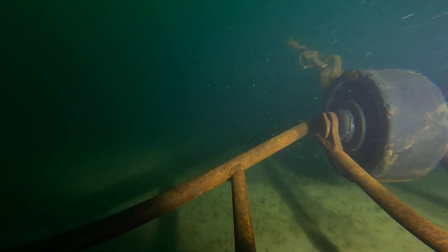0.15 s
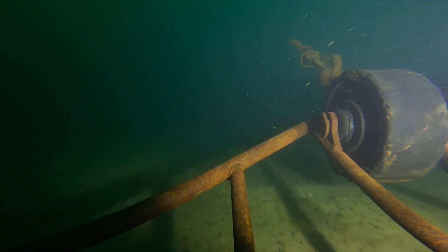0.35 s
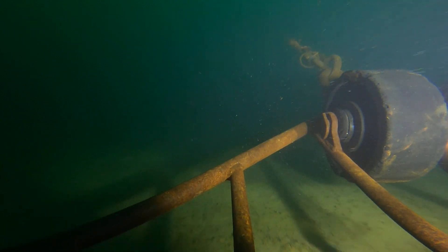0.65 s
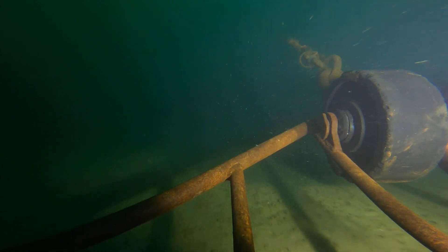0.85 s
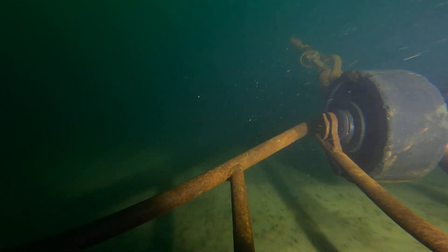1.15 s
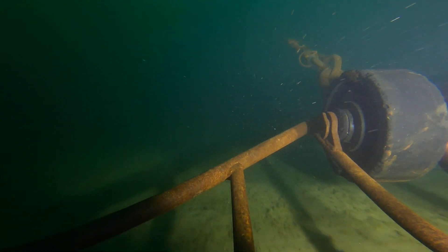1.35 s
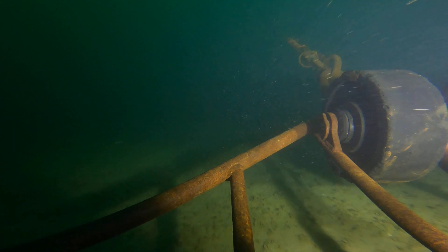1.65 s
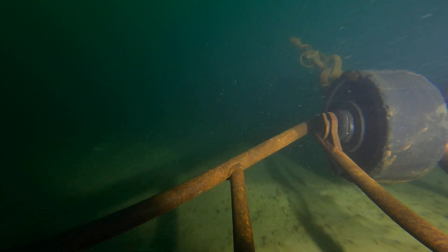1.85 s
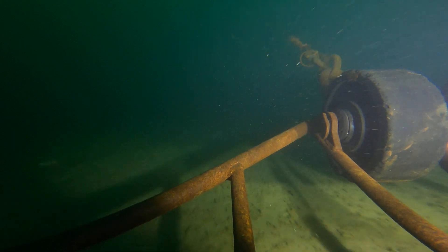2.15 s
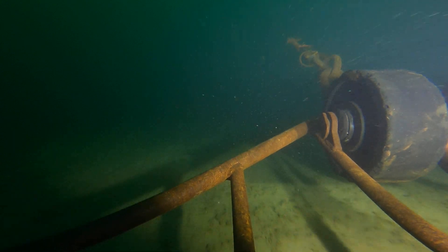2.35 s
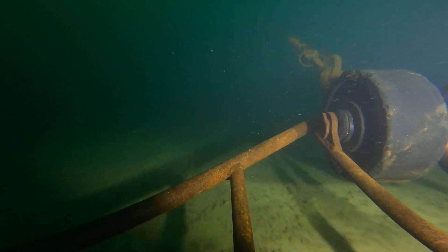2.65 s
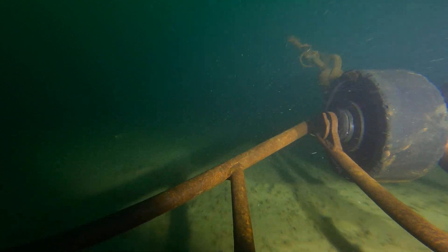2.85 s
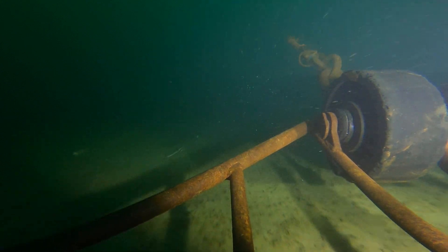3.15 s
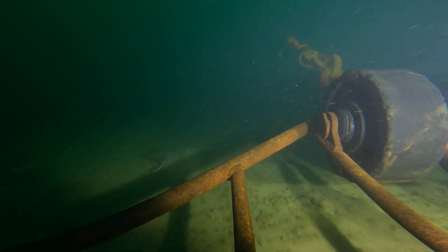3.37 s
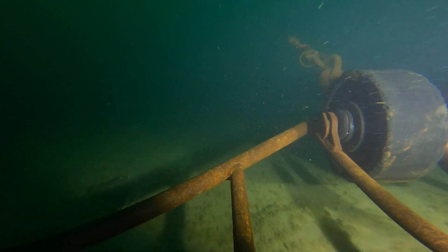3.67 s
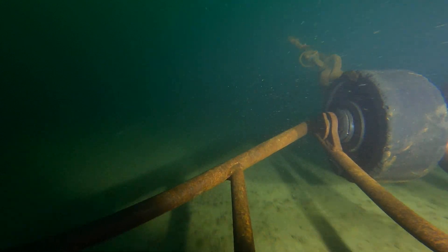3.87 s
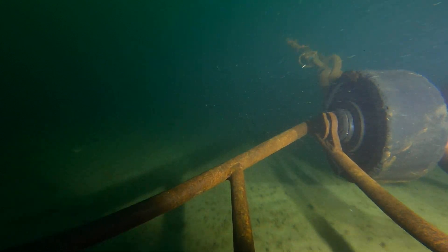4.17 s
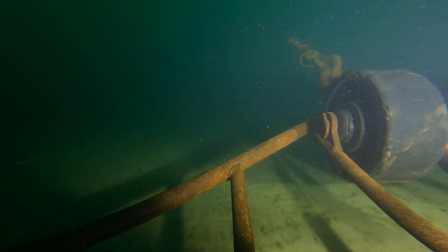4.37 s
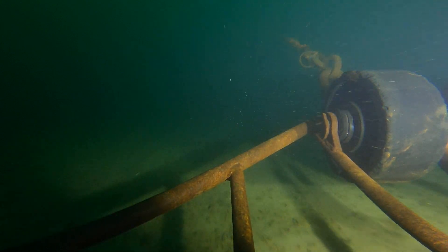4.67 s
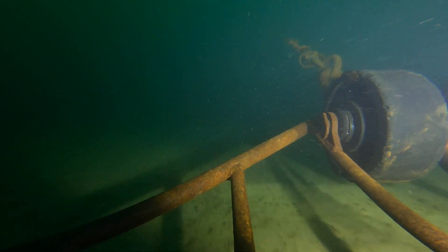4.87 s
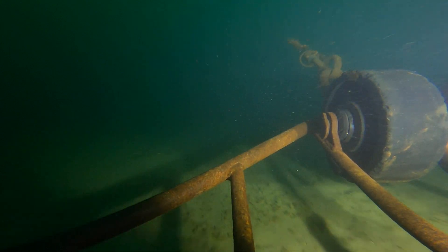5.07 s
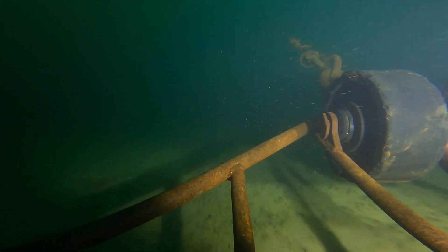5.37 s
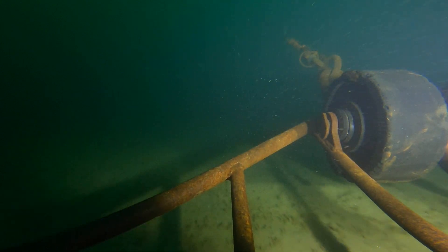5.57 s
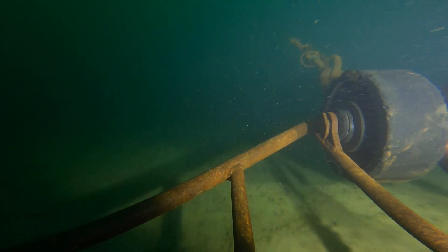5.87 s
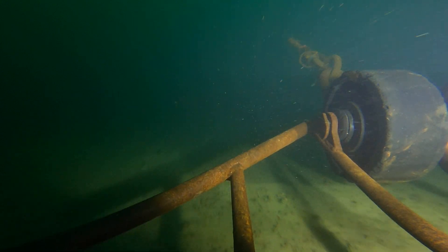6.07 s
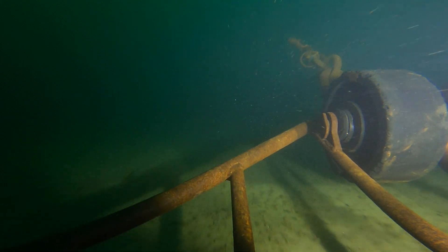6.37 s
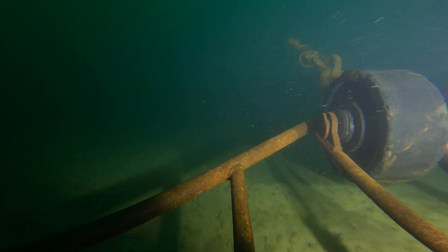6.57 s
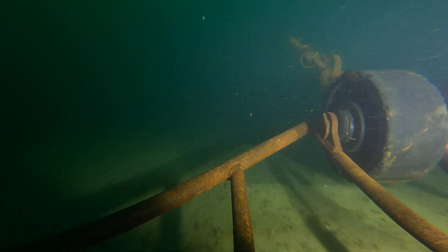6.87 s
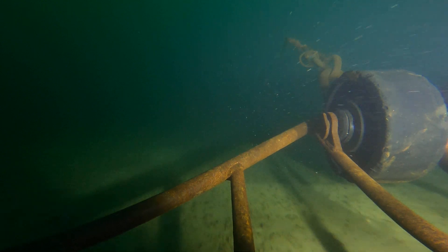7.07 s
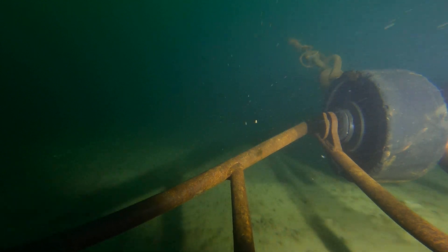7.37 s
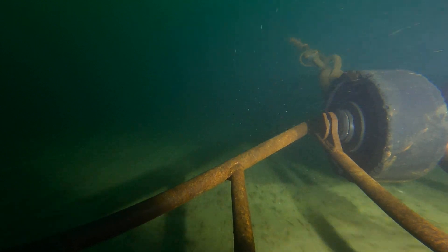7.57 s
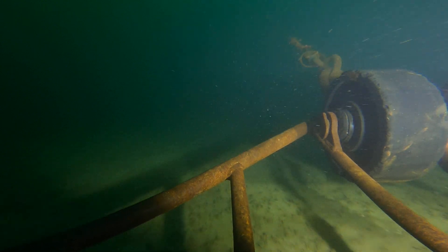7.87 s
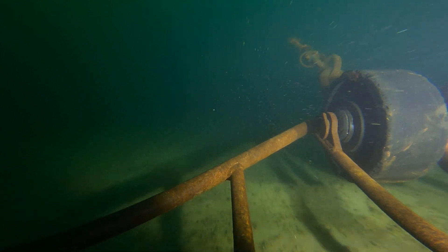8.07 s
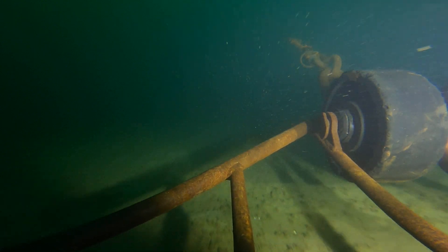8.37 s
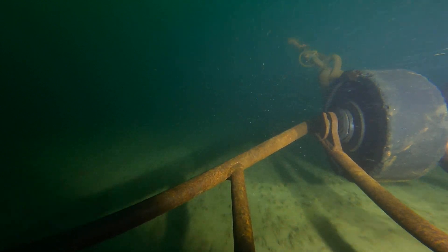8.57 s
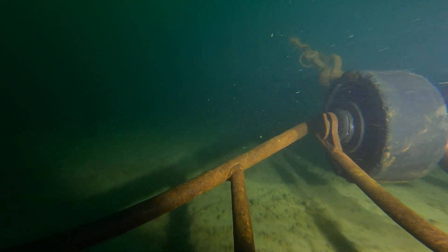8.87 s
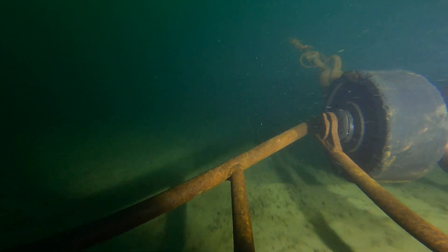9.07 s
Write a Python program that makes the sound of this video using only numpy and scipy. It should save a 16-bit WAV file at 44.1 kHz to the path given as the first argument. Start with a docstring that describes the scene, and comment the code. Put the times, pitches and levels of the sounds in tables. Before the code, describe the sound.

Underwater, a steel dredge grinds across sandy gravel: a low wavering hum under constant gritty scraping, dull stone knocks and bright shell clinks.

```python
"""Dredge on a sandy seabed

A steel dredge is towed over sand, heard under water from a housing fixed to its frame.
The taut tow line strums as a wandering low sine, over a wash of filtered noise.
Gravel grinds as dense random grains; stones knock and shells clink as noise bursts through frame modes.
Sand crackles in short swells; now and then the frame thuds, grit ticks and a bubble rings."""
import sys
import numpy as np
from scipy import signal
from scipy.fft import rfft, irfft, next_fast_len
from scipy.io import wavfile
from scipy.ndimage import uniform_filter1d

SR = 44100
rng = np.random.default_rng(int(sys.argv[2]) if len(sys.argv) > 2 else 0)


def int16_out(signal):
    """Quantize to a 16-bit WAV file."""
    q = np.round(np.clip(np.atleast_2d(signal).T, -1, 1) * 32767)
    wavfile.write(sys.argv[1], SR, q.astype(np.int16))


N = 407043
SIZE = next_fast_len(N + SR // 2)  # transform length, with room for tails
HZ = np.maximum(np.arange(SIZE // 2 + 1) * SR / SIZE, 1)
TIME = np.arange(N) / SR


def from_db(db):
    """Decibels to gain."""
    return 10 ** (np.asarray(db) / 20)


def rms_one(x):
    """Scale to unit power."""
    return x / np.sqrt(np.mean(np.abs(x) ** 2) + 1e-20)


def over_hz(points):
    """Draw a curve of (f/Hz, value) over every frequency, straight in log frequency."""
    hz, value = np.transpose(points)
    return np.interp(np.log(HZ), np.log(hz), value)


def in_time(curve):
    """Draw a curve of (t/s, value) at every sample."""
    return np.interp(TIME, *np.transpose(curve))


def filtered(x, response):
    """Apply a frequency response."""
    return irfft(rfft(x, SIZE) * response, SIZE)[..., :N]


def noise(response):
    """Noise of unit power with the given response."""
    white = rng.standard_normal(SIZE)
    return rms_one(irfft(rfft(white) * response, SIZE)[:N])


def drift(rate_hz):
    """Slow random wander with spread 1."""
    return noise(1 / (1 + (HZ / rate_hz) ** 2))


def swells(rows):
    """Smooth bumps of height 1 from rows of (t/s, half length/s)."""
    bumps_at = (np.exp(-(((TIME - s) / half_s) ** 2).clip(0, 30)) for s, half_s in rows)
    return sum(bumps_at).clip(0, 1)


def tone(pitch_hz):
    """A sine of unit power that follows a pitch."""
    return np.sqrt(2) * np.sin(2 * np.pi * np.cumsum(pitch_hz) / SR)


def resonance(hz, width_hz):
    """Response of one mode, 1 on top."""
    return 1 / (1 + 1j * (HZ ** 2 - hz ** 2) / (HZ * width_hz))


def causal(spectrum):
    """Minimum-phase response of a spectrum: nothing sounds before its cause."""
    cepstrum = irfft(np.log(from_db(over_hz(spectrum))), SIZE)
    return np.exp(rfft(2 * cepstrum[:SIZE // 2], SIZE))


def grains(per_s, spread_db):
    """Random tiny impacts of uneven size, each reaching the two microphones a little differently."""
    sizes = from_db(spread_db * np.minimum(rng.exponential(1, N), 4)) * rng.choice([-1, 1], N)
    hits = rng.random(N) < per_s / SR
    return rms_one(sizes * hits * (1 + 0.31 * rng.standard_normal((2, N))))


def add(track, s, sound):
    """Mix a short sound in at a time."""
    start = max(round(s * SR), 0)
    track[:, start:start + sound.shape[-1]] += sound[..., :N - start]


def crunch(rise_s, t60, apart=0.27):
    """Force of one blow: a burst of micro-contacts that dies away, of unit energy."""
    t = TIME[:SR // 6]
    white = rng.standard_normal((3, len(t)))
    shape = (1 - np.exp(-t / rise_s)) * from_db(-60 * t / t60)
    burst = (white[0] + apart * white[1:]) * shape  # shared part plus a part of each side's own
    return rms_one(burst) / np.sqrt(len(t))


def blow(rise_s=0.0012, contact_s=0.012, tail_db=-4.0, tail_t60=0.23):
    """Force of a stone: a short crushing contact, then a weaker shudder; unit energy."""
    t = TIME[:SR // 6]
    white = rng.standard_normal((3, len(t)))
    crush = np.exp(-(t / contact_s) ** 4)
    shudder = from_db(tail_db - 60 * t / tail_t60)
    shape = (1 - np.exp(-t / rise_s)) * (crush + shudder)
    return rms_one((white[0] + 0.24 * white[1:]) * shape) / np.sqrt(len(t))


def ping(hz, t60):
    """One mode ringing out: a decaying sine with a soft 1 ms onset."""
    t = TIME[:SR // 8]
    return from_db(-60 * t / t60) * (1 - np.exp(-t / .001)) * np.sin(2 * np.pi * hz * t)


def pitched(contact, hz, sharpness):
    """The part of a contact that a pebble of this pitch favours, at an even strength."""
    own = rms_one(signal.lfilter(*signal.iirpeak(hz, sharpness, fs=SR), contact))
    return own * np.sqrt(np.pi * hz / sharpness / SR / contact.shape[1])


# ringing modes of the steel frame: (f/Hz, width/Hz, lift/dB)
FRAME_MODES = [(529.5, 57, 13.5), (771, 89, 7.5), (932, 91, 6.5), (1221.8, 31, 11.5), (1557, 310, 6),
               (2060, 48, 9.5), (2538, 53, 12), (2705, 101, 13), (3036, 88, 11), (3660, 82, 8.5),
               (4100, 46, 8.5), (4720, 660, 7), (6480, 110, 12), (7325, 210, 9), (7720, 190, 14),
               (8800, 410, 7), (10070, 400, 7.5)]


def frame_response(contact):
    """How the modes of the frame answer one kind of contact, at unit power."""
    response = causal(contact)
    for hz, width_hz, lift_db in FRAME_MODES:
        response = response * (1 + (from_db(lift_db) - 1) * resonance(hz, width_hz))
    return rms_one(response)


def frame(force, contact):
    """A lasting force rings the modes of the frame; power is kept."""
    return filtered(force, frame_response(contact))


def ringing(contact):
    """The frame's ring after a single tap."""
    return irfft(frame_response(contact), SIZE)[None, :SR // 8]


def struck(force, ring):
    """One blow heard through the frame, of unit energy."""
    sound = signal.fftconvolve(force, ring, axes=1)
    return rms_one(sound) / np.sqrt(sound.shape[1])


# how hard the runners bite; only its swing about the mean counts: (t/s, level/dB)
DRAG_CURVE = [(0.0, -29.5), (1.8, -31.5), (2.35, -29), (4.1, -31.5), (4.6, -25.5), (4.96, -31), (5.4, -27),
              (7.8, -30.5), (9.2, -28)]


def drag():
    """How much harder than usual the runners bite at each moment, in dB."""
    level_db = in_time(DRAG_CURVE)
    return level_db - level_db.mean()


# small bubble pinching off: (t/s, f/Hz, level/dB)
BUBBLE_PINGS = [(6.113, 2730, -24)]


def bubbles(t60=0.15):
    """A bubble rings for a moment at its own pitch."""
    out = np.zeros((2, N))
    for s, hz, db in BUBBLE_PINGS:
        add(out, s, from_db(db) * ping(hz, t60))
    return out


# the frame dropping on to the bed: (t/s, relative level/dB)
FRAME_DROPS = [(0.543, -39.5), (0.955, -41.5), (3.325, -35.5), (8.911, -41)]


def bumps(t60=0.24, gain_db=42.5):
    """The heavy frame lands with a muffled thud: a crunch through a broad low resonance."""
    force = np.zeros((2, N))
    for s, db in FRAME_DROPS:
        add(force, s, from_db(db + gain_db) * crunch(0.0088, t60))
    return filtered(force, rms_one(resonance(350, 780) ** 4))


# grit giving way under a runner: (t/s)
GRIT_SNAPS = [2.006, 3.115, 3.453, 4.723, 5.555, 6.814, 7.033, 8.504, 8.565, 8.641, 9.112]


def snaps(snap_db=-9.5, snap_hz=3200, sharpness=5, own_ring=1.3, t60=0.045):
    """A grain of grit gives way with a light, dry tick."""
    out, ring = np.zeros((2, N)), ringing(SHELL_COLOUR)
    for s in GRIT_SNAPS:
        force = crunch(.0005, t60)
        own = own_ring * pitched(force, snap_hz, sharpness)
        add(out, s, from_db(snap_db) * struck(force + own, ring))
    return out


# crests of sand sweeping over the steel: (t/s, relative level/dB)
SAND_SWEEPS = [(0.258, -37), (0.336, -39), (1.829, -39), (1.92, -38), (2.123, -27), (3.419, -30),
               (4.712, -35), (5.17, -30.5), (5.435, -26), (6.069, -29), (6.415, -30), (6.629, -30.5),
               (8.998, -28.5), (9.13, -32)]
# colour of sand on steel: (f/Hz, relative level/dB per Hz)
SAND_COLOUR = [(600, -8), (1500, 15), (3300, 1.5), (5500, 2), (7500, -11.5), (10000, -21.5), (11000, -29.5),
               (15000, -54)]
SWEEP_RISE_S, SWEEP_FALL_S = 0.031, 0.008  # every sweep swells and lets go alike


def sand(drag_db, trickle_db=-45.5, follows=0.49):
    """Fine grains crackle on the steel, swell up and let go quickly."""
    waver_db = 2.8 * drift(11)
    level = from_db(trickle_db + follows * drag_db + waver_db)
    for s, db in SAND_SWEEPS:
        rising = ((s - TIME) / SWEEP_RISE_S).clip(0) ** 2
        falling = (TIME - s) / SWEEP_FALL_S
        level = level + from_db(db) * np.exp(-np.maximum(rising, falling).clip(0, 20))
    crackle = grains(per_s=3500, spread_db=3.8)
    return frame(level * crackle, SAND_COLOUR)


# loudest shells and pebbles on bare steel: (t/s, relative level/dB, crack against clink level/dB)
SHELL_CLINKS = [(0.0803, -30, -14), (0.1017, -39, -0.5), (0.586, -31, -15), (0.909, -29, -13),
                (1.171, -38.5, -16), (1.477, -32.5, -15.5), (2.2795, -30, -13.5), (2.2946, -24, -29),
                (2.4406, -33, -11), (2.734, -25, -13.5), (2.8415, -26.5, -22), (3.325, -39.5, -13.5),
                (3.5051, -30.5, -16.5), (4.248, -30, -40.5), (4.62, -25, -16.5), (4.817, -32.5, -12),
                (5.1832, -29, -9.5), (5.3409, -27.5, -31.5), (5.38, -32.5, -17.5), (5.4266, -26, -4),
                (5.858, -26.5, -18), (6.003, -25, -2), (6.133, -24.5, -32.5), (6.155, -28, -22),
                (6.9458, -33, -10), (7.4052, -27.5, -36), (7.4795, -34.5, -8), (7.5434, -34, -15),
                (7.6675, -31.5, -19), (7.8513, -35, -12), (8.141, -32, -32.5), (8.4286, -23.5, -30),
                (8.716, -27.5, -16.5), (8.9547, -26, -7.5), (9.019, -21, -29.5)]
# modes in which the tube sings: (f/Hz, strength)
TUBE_MODES = [(2820, .4), (3577, .3), (4143, .6), (4705, 1)]
# colour of a shell on steel: (f/Hz, relative level/dB per Hz)
SHELL_COLOUR = [(400, -12), (1300, 6), (2200, 9.5), (3300, 0.5), (4700, 0), (6000, -5.5), (12000, -71)]
# colour of a sharp crack: (f/Hz, relative level/dB per Hz)
CRACK_COLOUR = [(2000, 3.5), (5700, 2), (7500, -8.5), (9000, -21.5), (13000, -26), (16000, -42)]


def shells(tap=0.93, chatter_t60=0.033, crack_t60=0.022, own_ring=0.47,
           ticks_db=-54.0, clink_db=25.0, crack_gain_db=31, sing_db=5.0):
    """Hard contacts: a sharp tap and brief chatter at the pebble's own pitch, fainter ticks between."""
    ticks = signal.fftconvolve(grains(per_s=12, spread_db=2.5), crunch(.0008, .024), axes=1)[:, :N]
    clinks = from_db(ticks_db) * frame(ticks, SHELL_COLOUR)
    cracks = np.zeros((2, N))
    shell_ring, crack_ring = ringing(SHELL_COLOUR), ringing(CRACK_COLOUR)
    for s, db, crack_db in SHELL_CLINKS:
        rattle = crunch(0.00031, chatter_t60)
        rattle = rattle + own_ring * pitched(rattle, rng.uniform(2900, 6200), 5.0)
        rattle[:, 0] += tap / 2
        add(clinks, s, from_db(db + clink_db) * struck(rattle, shell_ring))
        crack = struck(crunch(0.00034, crack_t60), crack_ring)
        add(cracks, s, from_db(db + crack_db + crack_gain_db) * crack)
        # a hard crack leaves a mode of the frame ringing near 2.6 kHz
        add(cracks, s, from_db(db + crack_db + 7) * ping(2600, .08))
        # the weaker the crack, the more the tube sings
        song = sum(share * rng.uniform(.5, 1.3) * ping(hz * rng.uniform(.985, 1.015), .04)
                   for hz, share in TUBE_MODES)
        singing = np.clip(-crack_db / 16 - .6, 0, 1)
        add(clinks, s, from_db(db + sing_db) * singing * song)
    return clinks * from_db([[-1.0], [1.0]]) + cracks  # clinks lean to the right


# colour of gravel under the runners: (f/Hz, relative level/dB per Hz)
GRAVEL_COLOUR = [(200, 3.5), (520, -6), (900, 5), (1500, -3), (2200, -18), (3300, -32), (5300, -27),
                 (8300, -46.5), (10000, -47.5), (11500, -85.5)]


def gravel(drag_db, grit_db=-32.5, lumpy_db=3.5):
    """The runners grind on unevenly over dense grit."""
    grit = grains(per_s=8000, spread_db=1)
    force = grit * from_db(grit_db + drag_db + lumpy_db * drift(16.0))
    return frame(force, GRAVEL_COLOUR)


# large stones against the frame: (t/s, relative level/dB, centre f/Hz)
LARGE_KNOCKS = [(0.064, -17.5, 778), (0.545, -19, 870), (1.094, -18, 1587), (1.334, -14, 990),
                (1.406, -14.5, 1120), (1.541, -13.5, 1174), (1.848, -13.5, 1120), (1.954, -11.5, 1466),
                (2.164, -14.5, 1035), (2.297, -10, 1170), (2.461, -12.5, 1110), (2.709, -12.5, 883),
                (2.845, -14.5, 1200), (2.945, -12.5, 1186), (3.081, -16, 810), (3.163, -20, 1210),
                (3.23, -13.5, 1170), (3.332, -12.5, 781), (4.253, -13, 1277), (4.276, -16.5, 1560),
                (4.488, -14, 1205), (4.595, -15, 886), (4.715, -15, 1120), (4.949, -16.5, 830),
                (5.291, -14, 1217), (5.343, -12.5, 1270), (5.417, -13.5, 1225), (5.776, -10, 1020),
                (5.878, -21.5, 980), (6.003, -16, 1200), (6.137, -12.5, 1200), (6.198, -11.5, 847),
                (6.277, -18, 917), (6.573, -15, 910), (6.885, -12.5, 1318), (6.945, -12, 1150),
                (7.191, -19.5, 1670), (7.408, -13, 1306), (7.474, -16, 790), (7.59, -14.5, 843),
                (7.926, -17, 740), (8.107, -15.5, 1205), (8.43, -10.5, 1280), (8.601, -12, 800),
                (8.707, -15.5, 1163), (9.018, -12, 797)]
# further knocks of stones against the frame, all equally hard: (t/s)
FURTHER_KNOCKS = [0.399, 0.708, 1.303, 1.823, 2.077, 2.372, 3.416, 3.579, 3.864, 3.888, 4.133, 4.355, 4.407,
                  5.122, 5.742, 6.376, 6.458, 6.622, 7.449, 7.979, 8.077, 8.221, 8.302, 8.582, 9.168]
# colour of a stone on steel: (f/Hz, relative level/dB per Hz)
STONE_COLOUR = [(150, -0.5), (400, -2.5), (700, 3), (1300, 7), (3200, -16), (5000, -33.5), (12000, -87)]
STONE_Q, STONE_TONE = 7, 3.2  # sharpness of a stone's own tone, and its strength against the broad thud
KNOCK_RISE_S = .003  # a stone touches this long before its listed time


def stones(drag_db, small_per_s=24, small_db=-27, size_db=7.5, follows=0.44, strike_db=21.5,
           blip_q=11, blip_tone=9, further_db=-19.0, thud_db=11.0, thud_top_db=-16.5):
    """Dull knocks of large stones, rounder blips of small ones, thuds of pebbles that clink alone."""
    gap, size, pitch = rng.random((400, 3)).T
    times = np.cumsum(.2 - .8 * np.log(gap)) / small_per_s
    levels = small_db + size_db * (2 * size - 1) + follows * np.interp(times, TIME, drag_db)
    small = [(s, db, hz, blip_q, blip_tone)
             for s, db, hz in zip(times, levels, 600 * 2.3 ** pitch) if s < TIME[-1]]
    # a clink more than 10 ms from any large knock also thuds
    lone = [(s, db) for s, db, _ in SHELL_CLINKS
            if min(abs(s - knock[0]) for knock in LARGE_KNOCKS) > .01]
    clear = [(s - KNOCK_RISE_S, further_db) for s in FURTHER_KNOCKS]
    clear += [(s - KNOCK_RISE_S * 0, min(db + thud_db, thud_top_db)) for s, db in lone]
    further = [(s, db, rng.uniform(900, 1300), STONE_Q, STONE_TONE) for s, db in clear]
    large = [(s - KNOCK_RISE_S, db, hz, STONE_Q, STONE_TONE) for s, db, hz in LARGE_KNOCKS]
    out, ring = np.zeros((2, N)), ringing(STONE_COLOUR)
    for s, db, hz, sharpness, strength in large + further + small:
        contact = blow()
        own = strength * pitched(contact, hz, sharpness)
        add(out, s, from_db(db + strike_db) * struck(contact + own, ring))
    return out


# plainest drop-outs of the hum: (t/s, half length/s)
HUM_LULLS = [(2.992, 0.024), (3.669, 0.032), (4.012, 0.0718), (5.018, 0.057)]
# rate, typical half length and its spread in octaves
COLLAPSES_PER_S, COLLAPSE_S, COLLAPSE_SPREAD = 2.6, 0.019, 0.45


def collapses():
    """How far the line's swing has broken down, 0-1; it collapses at uneven intervals and starts anew."""
    gaps = rng.gamma(2, .5, size=80) / COLLAPSES_PER_S
    lengths = COLLAPSE_S * 2 ** (COLLAPSE_SPREAD * rng.standard_normal(size=80).clip(-2, 2))
    chance = [row for row in zip(np.cumsum(gaps), lengths) if row[0] < TIME[-1]]
    return swells(list(HUM_LULLS) + chance)


# crests of the line's upper mode: (t/s, level/dB)
MODE_SURGES = [(0.76, -29.5), (1.6, -25), (2.37, -23), (3.13, -27), (3.37, -22.5), (6.28, -24),
               (7.04, -27.5), (7.41, -21), (7.64, -21), (8.12, -24), (9.07, -20.5)]


def upper_mode(mode_hz=174, wander_hz=6, surge_s=0.056, rest_db=-33.5):
    """A faint murmur of the line's upper mode that gathers into short, gliding tones."""
    level = sum(from_db(db) * swells([(s, surge_s)]) for s, db in MODE_SURGES)
    surges = level * tone(mode_hz + wander_hz * drift(8))
    murmur = from_db(rest_db) * noise(resonance(mode_hz, 27) ** 2)
    return surges + murmur


# stretches in which the hum throbs quickly: (t/s, half length/s)
HUM_THROBS = [(0.52, 0.27), (7.88, 0.18)]
# colour of the turbulence around the housing: (f/Hz, relative level/dB per Hz)
WASH_COLOUR = [(12, -45), (25, 11), (55, 14), (76, 18), (108, 19), (130, -4.5), (155, -14), (210, -29),
               (300, -12), (1000, -110)]


def tow_line(hum_hz=93.92, wander_hz=3.17, slip_hz=11.78, sag_hz=8, hum_db=-14.0,
             flutter_db=3.0, throb_hz=15):
    """Vortices shake the line: a swing that throbs at times, its pitch sagging and slipping at collapses."""
    weak = collapses()
    pitch = hum_hz + wander_hz * drift(7.3) + weak * (slip_hz * drift(26.8) - sag_hz)
    throb = 1 + .8 * swells(HUM_THROBS) * np.sin(2 * np.pi * throb_hz * TIME + drift(6))
    level = from_db(hum_db + flutter_db * drift(28)) * (1 - weak) * throb
    hum = level * tone(pitch)
    # the water churns more while the swing is broken up
    wash = from_db(-20.5 + 5.1 * weak) * noise(causal(WASH_COLOUR))
    return hum + upper_mode() + wash


# left against right microphone: (f/Hz, level/dB)
MIC_BALANCE = [(230, -2), (560, 4), (890, 1), (1250, 3), (3450, 6), (4830, -2.5), (9500, 0.5)]
# phase by which the left microphone leads: (f/Hz, phase/rad)
MIC_LEAD = [(150, -0.6), (600, -0.68), (860, -1.07), (1300, -0.58), (1810, -0.35), (2500, -1.2), (4050, 1),
            (5500, -0.51)]


def scene():
    """The hum moves the whole housing; contacts reach its two microphones by different paths."""
    drag_db = drag()
    contacts = gravel(drag_db) + stones(drag_db) + shells() + snaps() + sand(drag_db) + bumps() + bubbles()
    half = from_db(over_hz(MIC_BALANCE) / 2) * np.exp(1j * over_hz(MIC_LEAD) / 2)
    return filtered(contacts, np.array([half, 1 / half])) + tow_line() * from_db([[.25], [-.25]])


def record(dry, ceiling=0.41, split_hz=260, cutoff_hz=15600):
    """A limiter holds the bass under a ceiling; the top is cut and the ends are eased."""
    bass = signal.sosfiltfilt(signal.butter(4, split_hz, fs=SR, output="sos"), dry)
    swing = uniform_filter1d(np.abs(signal.hilbert(bass.mean(0), SIZE))[:N], size=300)
    gain = (1 + (swing / ceiling) ** 8) ** (-1 / 8)
    ends = np.clip(np.minimum(TIME, TIME[::-1]) / .004, 0, 1)
    limited = ends * (dry + bass * (gain - 1))
    return signal.sosfilt(signal.cheby2(12, 70, cutoff_hz, fs=SR, output="sos"), limited)


dry = scene()
out = record(dry)
int16_out(out)
```